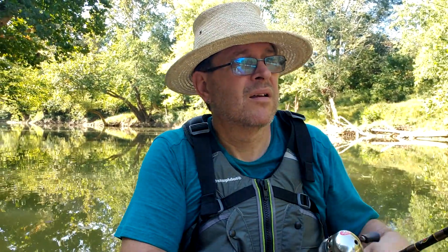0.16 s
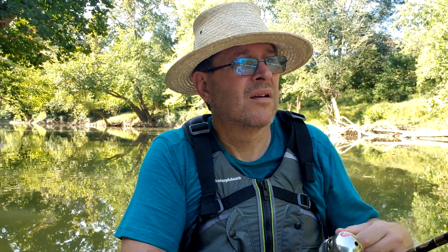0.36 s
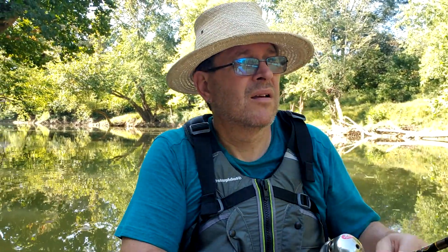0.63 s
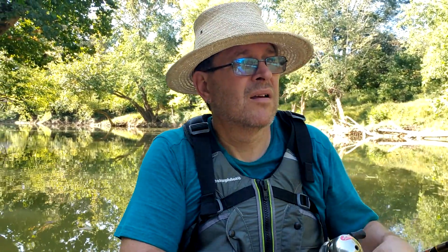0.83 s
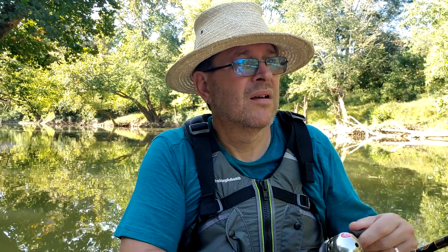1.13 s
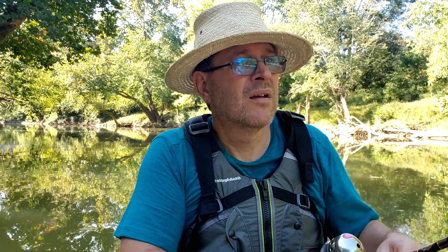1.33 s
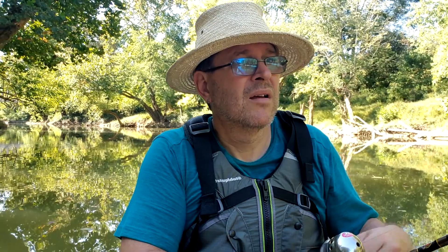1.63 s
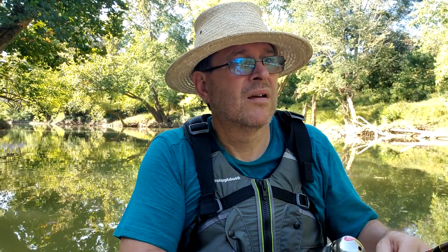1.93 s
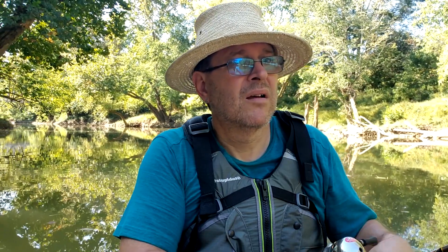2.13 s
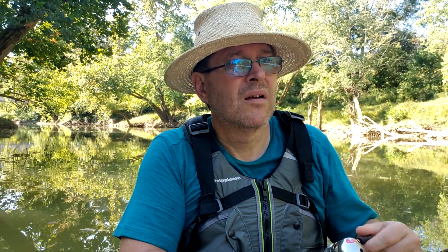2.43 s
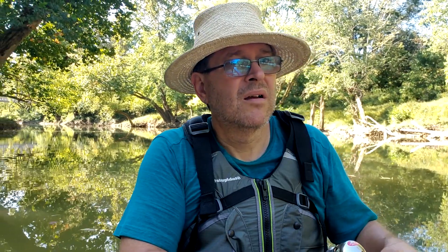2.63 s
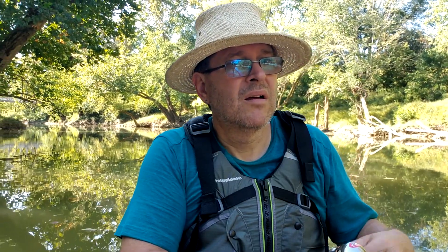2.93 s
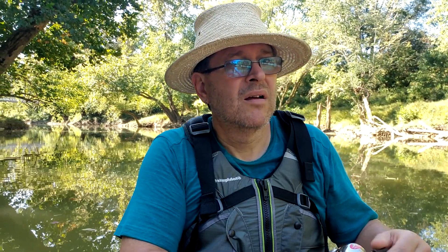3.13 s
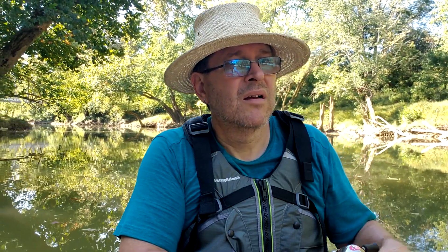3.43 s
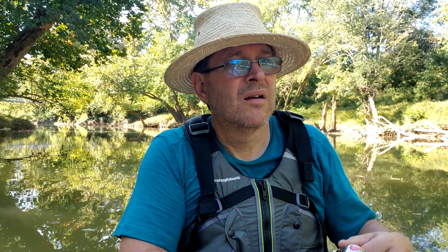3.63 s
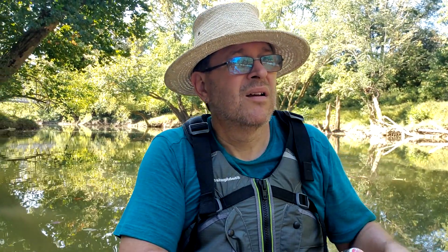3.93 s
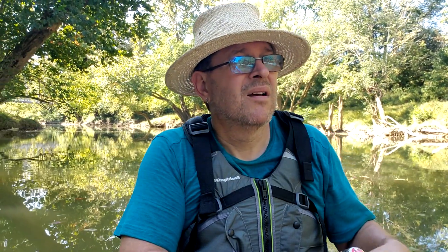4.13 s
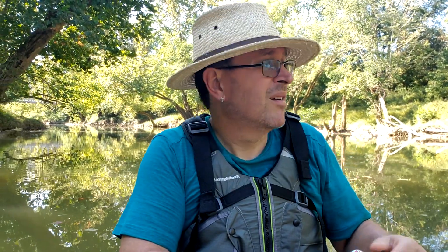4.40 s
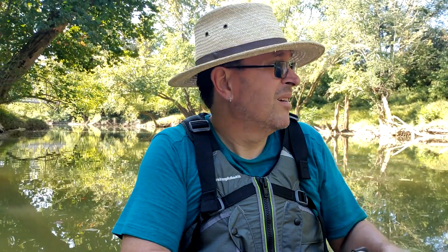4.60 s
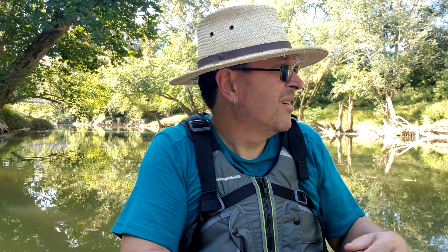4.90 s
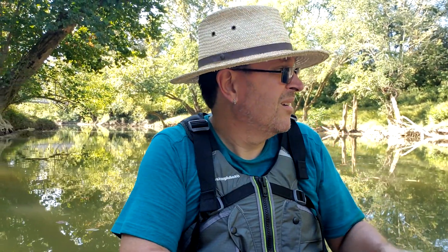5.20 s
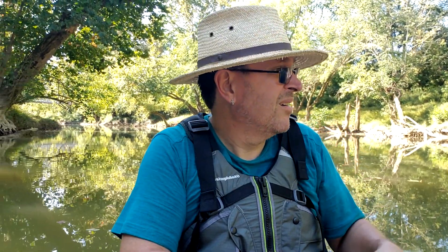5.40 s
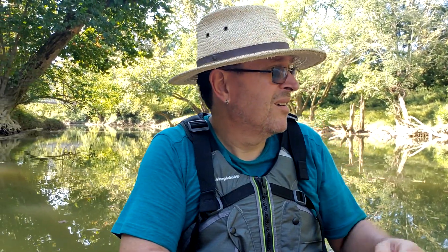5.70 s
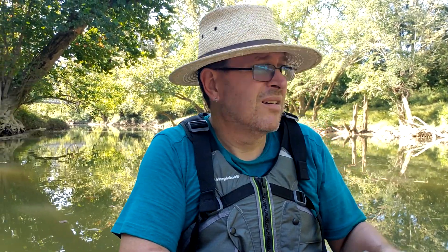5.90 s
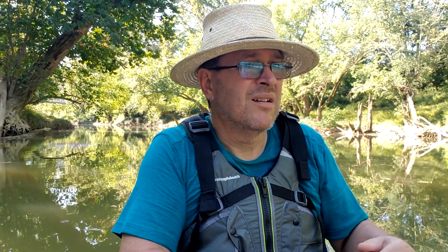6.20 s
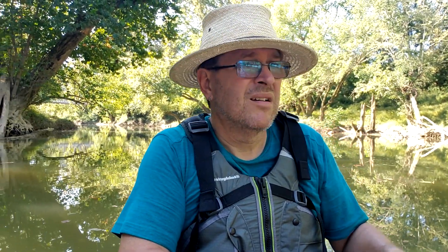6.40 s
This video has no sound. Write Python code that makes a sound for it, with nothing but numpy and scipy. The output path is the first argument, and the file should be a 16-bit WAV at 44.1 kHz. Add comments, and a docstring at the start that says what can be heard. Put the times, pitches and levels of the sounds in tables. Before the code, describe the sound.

Two close katydids, one on the left and one more ahead, scrape out very high buzzes that swell and stop, with runs of dry ticks between them. Behind them a steady insect chorus hisses and crickets trill faintly. A small bird gives short, thin wheezes on the right, and farther birds whistle softly. Late on come two faint bumps on a boat, over a very soft rumble on an open river.

```python
"""Katydids on a late-summer river bank

Two near meadow katydids, one left and one more ahead, scrape their wings in swelling buzzes and runs
of ticks. Behind them sit a shimmer of farther ones, and the steady hiss of an insect chorus and three
crickets across the water. A small bird wheezes on the right, others whistle farther off in the trees,
something knocks faintly on a boat, and the distance rumbles very softly."""
import sys
import numpy as np
from scipy import signal
from scipy.fft import rfft, irfft, next_fast_len
from scipy.io import wavfile
from scipy.ndimage import uniform_filter1d, map_coordinates

SR = 44100
rng = np.random.default_rng(int(sys.argv[2]) if len(sys.argv) > 2 else 0)


def generate_wav(sig):
    """Save sig (samples, or channels by samples) to the path in sys.argv[1] as 16-bit PCM at SR."""
    pcm = np.round(np.clip(np.atleast_2d(sig).T, -1, 1) * 32767).astype(np.int16)
    wavfile.write(sys.argv[1], SR, pcm)


N = 288855

# The near katydids' buzzes. Each row: start and end in seconds, first and last wing cycles per second,
# relative level at the crest in dB.
LEFT_BUZZES = [(-.603, .73, 50.6, 46.2, -32.5), (.773, 2.36, 51.2, 44.4, -31.2),
               (2.378, 3.22, 52, 48.6, -33), (3.559, 4.83, 48.4, 45.7, -31),
               (5.118, 6.55, 48.2, 46.3, -30.2)]
AHEAD_BUZZES = [(-.094, .51, 60.9, 57.8, -32), (1.218, 1.83, 60, 58, -30.5), (2.617, 3.23, 60, 58.4, -32),
                (3.993, 4.63, 59.8, 58.4, -28.5), (5.307, 5.91, 60, 58, -28.5)]
# Single slow wing strokes. Each row: time in seconds, level in dB, left over right in dB.
TICKS = [(.607, -28.5, 10), (.905, -32, 4), (.967, -33, 4), (1.026, -29, 5), (1.075, -29, 6),
         (1.129, -31.5, 5), (2.095, -33, 11), (2.158, -30, 6), (2.264, -35, 16), (2.443, -31, 9),
         (2.492, -34, 14), (2.54, -29, 10), (2.633, -35, 14), (3.093, -32, 18), (3.16, -30.5, 7),
         (3.22, -30, 9), (3.283, -30.5, 8), (3.378, -30.5, 14), (3.438, -28, 9), (3.498, -29.5, 13),
         (3.56, -29.5, 13), (3.74, -28, 5), (3.787, -26, 8), (3.833, -28, 7), (3.888, -27, 7),
         (4.757, -31, 3), (4.82, -34, 10), (4.88, -30, 8), (4.946, -33, 10), (5.005, -28.5, 7),
         (5.03, -32, 1), (5.076, -26.5, 3), (5.122, -29, 5), (5.17, -25, 4), (5.215, -28.5, 5),
         (5.268, -30.5, 5), (6.365, -30, 7), (6.43, -28, 9), (6.472, -33, 5), (6.52, -37, 7)]
# The tone of the katydids' wings; a tick's slow stroke rings them more broadly.
# Each row: frequency in Hz, relative level in dB.
LEFT_WING = [(5800, -76), (6500, -51), (9000, -17), (11000, -7.5), (12200, -4.5), (13500, 1), (14500, 5.5),
             (16000, -0.5)]
AHEAD_WING = [(5800, -76), (6500, -38), (9000, -20), (10600, -19.5), (11700, -3), (12300, -5), (13300, 1.5),
              (14500, -0.5), (16000, -0.5)]
TICK_WING = [(5800, -70), (6500, -30), (9000, -20), (11000, -11), (12200, -4), (13300, 0), (14200, -1.5),
             (15300, 0), (16000, -1), (20000, -8)]
FAR_WING = [(5800, -85), (6500, -36), (9000, -11), (10800, -4), (11900, 0.5), (14000, 2.5), (16000, -2.5)]
# Narrow ringing peaks that nearby reflections add. Each row: centre in Hz, width in Hz, boost in dB.
REFLECTION_PEAKS = [(10880, 140, 3), (11430, 170, 2.5), (11850, 260, 4), (12380, 150, 4), (12660, 190, 10),
                    (13270, 120, 4.5), (13920, 170, 6.5), (14190, 150, 3.5), (14660, 150, 3.5),
                    (14950, 110, 3), (15320, 150, 5.5), (15640, 140, 4.5)]
# Bouts when the far katydids sing together. Each row: start and end in seconds, rise in dB.
FAR_BOUTS = [(-.2, 0.593, 1), (1.134, 1.88, 3), (1.85, 3.23, 1.3), (3.75, 4.663, 3), (5.27, 5.997, 2.7)]
# The tone of the chorus on each side. Each row: frequency in Hz, relative level in dB.
CHORUS_LEFT = [(6050, -81), (6350, -32), (6720, -18), (6880, -9), (7100, -4.5), (7500, -.5), (7950, 1.7),
               (8400, -2), (9000, -16), (11000, -16)]
CHORUS_RIGHT = [(6050, -75), (6350, -35), (6700, -19), (6950, -9), (7150, -6), (7500, 0), (7900, -.3),
                (8400, -9.5), (9000, -19), (11000, -22)]
# The crickets' songs. Each row: pitch in Hz, pulses per second, chirps per second, time offset in
# seconds, depth of the gaps between chirps from 0 to 1, level in dB, left over right in dB.
CRICKETS = [(6380, 29, 4.84, .215, 1, -68, 4), (6580, 29.1, 0, .12, 0, -67, 2), (6260, 31, 0, 0, 0, -77, 0)]
# The small bird's wheezes. Each row: start and length in seconds, first and last top pitch in Hz,
# rough depth of the pitch dips in Hz, relative level in dB, clear note over the rasp in dB.
WHEEZES = [(-.06, 0.11, 4440, 4340, 350, -65.5, -12), (0.527, 0.15, 4365, 4280, 930, -59, -8),
           (1.073, 0.27, 4120, 4060, 654, -63, -9), (1.799, 0.17, 4235, 4250, 753, -59, -6),
           (1.902, 0.12, 3754, 3474, 561, -62.5, -14), (2.944, 0.15, 4277, 4270, 880, -60, -4.5),
           (4.67, 0.15, 4545, 4520, 1150, -57.5, -6), (5.436, 0.096, 4150, 4335, 600, -60, -12),
           (6.211, 0.11, 4096, 4030, 327, -61.5, -6)]
# Far birds' notes. Each row: start and length in seconds, first and last pitch in Hz, level in dB.
FAR_NOTES = [(1.62, .15, 4900, 4890, -73.5), (2.602, 0.26, 5300, 5200, -73), (2.775, 0.45, 5320, 5400, -69),
             (2.885, .15, 5290, 4980, -65), (4.062, 0.041, 3430, 2770, -64)]
# Bumps on the boat. Each row: time in seconds, level in dB.
KNOCKS = [(4.362, -66), (5.017, -56.5)]
# The tone of the hull and of the background air. Each row: frequency in Hz, relative level in dB.
HULL_TONE = [(400, -23), (700, -6), (880, 5), (1000, -11), (1170, 8), (1550, -0.5), (1900, 3), (2300, 0),
             (2800, -7), (4000, -37)]
AIR_TONE = [(20, -9), (40, -7), (60, 0.5), (75, -1), (92, 1), (115, -3.5), (160, -6.5), (300, -10.5),
            (700, -14), (1400, -17), (2500, -20), (4800, -20.5), (6000, -29)]
# How the air leans to the left. Each row: frequency in Hz, left over right in dB.
AIR_PAN = [(100, 1.5), (200, -0.5), (700, 1), (1200, 1), (1800, 9), (2700, 15.5), (5000, 1.5)]
# The reverb of the trees. Each row: frequency in Hz, time to fade by 60 dB in seconds.
GROVE_DECAY = [(1000, 0.25), (4000, 0.69), (10000, 0.5), (16000, 0.39)]


def left_katydid():
    """The nearest singer draws its scraper over its wing file in long buzzes with a slower beat."""
    force = buzzing(LEFT_BUZZES, closing=0.17, opening_db=-5, edge_s=0.012,
                    swell_db=4, crest=0.5, sag_db=4)
    song = radiated(force * teeth(per_s=9000, rough_db=1), LEFT_WING)
    return amp(-1.5) * pan(13) * outdoors(song, scatter_s=0.0043, wet_db=-16)


def ahead_katydid():
    """The second singer answers with short, quick buzzes that build right to the end."""
    force = buzzing(AHEAD_BUZZES, closing=0.097, opening_db=-7, edge_s=0.0075,
                    swell_db=3, crest=0.65, sag_db=-1)
    song = radiated(force * teeth(per_s=10000, rough_db=2), AHEAD_WING)
    return amp(-2) * pan(4.9) * outdoors(song, scatter_s=0.0048, wet_db=-22)


def ticks(half_width_s=0.0059, return_s=0.021, return_db=-10):
    """Each tick is one slow sweep of the scraper along the file, then a weak return stroke."""
    t, force = np.arange(N) / SR, np.zeros((2, N))
    sweep = lambda at: np.exp(-.5 * np.minimum(np.abs(t - at) / half_width_s, 10) ** 2)
    for at, db, left_db in TICKS:
        force += amp(db) * pan(left_db) * (sweep(at) + amp(return_db) * sweep(at + return_s))
    song = radiated(force * teeth(per_s=10000, rough_db=1), TICK_WING)
    return outdoors(song, scatter_s=.004, wet_db=-16)


def buzzing(buzzes, closing, opening_db, edge_s, swell_db, crest, sag_db, uneven_db=1):
    """Force on the file: each wing cycle is a loud closing stroke and a weak opening one."""
    t, force = np.arange(N) / SR, np.zeros(N)
    for start, end, first_rate, last_rate, db in buzzes:
        progress = np.clip((t - start) / (end - start), 0, 1)
        cycles = (t - start) * (first_rate + (last_rate - first_rate) * progress / 2)
        # closing is a half-width in cycles, crest a share of the buzz's length
        off_beat = (cycles + .5) % 1 - .5
        stroke = np.exp(-.5 * (off_beat / closing) ** 2) + amp(opening_db)
        gate = np.clip((t - start) / edge_s + 1, 0, 1) * np.clip((end - t) / edge_s + .5, 0, 1)
        effort_db = db - np.interp(progress, [0, crest, 1], [swell_db, 0, sag_db])
        force = np.maximum(force, amp(effort_db) * unit(stroke) * gate)
    return force * amp(uneven_db * wobble(50))


def teeth(per_s, rough_db):
    """The scraper catches the file's teeth at uneven moments and with uneven force."""
    catches = rng.random(N) < per_s / SR
    return unit(catches * rng.choice([-1, 1], N) * amp(rough_db * rng.standard_normal(N)))


def radiated(scrape, spectrum, early_tuning=.989, crossfade_s=(2.6, 3.8)):
    """A wing radiates a broad band; nearby reflections add narrow peaks that shift slightly up midway."""
    def tuned(tuning):
        def response(hz):
            boost_db = sum(db / (1 + (2 * (hz / tuning - centre) / width) ** 2)
                           for centre, width, db in REFLECTION_PEAKS)
            return unit(amp(along(spectrum, hz) + boost_db))
        return filtered(scrape, response)
    early, late = tuned(early_tuning), tuned(1)
    return early + (late - early) * np.interp(np.arange(N) / SR, crossfade_s, [0, 1])


def far_katydids(join_s=0.05, quit_s=0.07):
    """Many farther singers blur into a fluttering shimmer that rises in bouts, duller on the right."""
    t, level_db = np.arange(N) / SR, np.full(N, -35.0)
    for start, end, rise_db in FAR_BOUTS:
        level_db += rise_db * np.clip(np.minimum((t - start) / join_s, (end - t) / quit_s) + .5, 0, 1)
    flutter_db = 1.22 * wobble(110) + 0.25 * wobble(20.67)
    shimmer = coloured(rng.standard_normal((2, N)), FAR_WING)
    return amp(level_db + flutter_db) * pan_bands(shimmer, [(11000, 1.8), (13500, 1.9), (15200, 3.6)])


def chorus():
    """The insects across the water merge into one even, lower band, stronger and deeper on the right."""
    bed = np.array([coloured(rng.standard_normal(N), side) for side in (CHORUS_LEFT, CHORUS_RIGHT)])
    shimmer_db = 0.66 * wobble(1.84) + 0.39 * np.array([wobble(120), wobble(120)])
    return amp(-43 + shimmer_db) * pan(-4) * bed


def crickets(uneven_db=2, stray_cycles=0.4, sag_hz=110):
    """One cricket chirps and two trill, in pulses of nearly pure tone that sag as the wing slows."""
    t, mix = np.arange(N) / SR, np.zeros((2, N))
    for hz, pulse_rate, chirp_rate, offset, depth, db, left_db in CRICKETS:
        stroke = (pulse_rate * (t - offset) + .5 + stray_cycles * wobble(4)) % 1
        chirps = 1 - depth + depth * np.cos(np.pi * chirp_rate * (t - offset)) ** 14
        tone = sine(hz + sag_hz * (.5 - stroke) + 35 * wobble(40))
        song = np.sin(np.pi * stroke) ** 2 * chirps * tone * amp(uneven_db * wobble(25))
        mix += amp(db) * pan(left_db) * unit(outdoors(song, scatter_s=.02, wet_db=-12))
    return mix


def wheezing_bird(rasp_hz=90, waver_hz=35, fade_share=0.27):
    """A thin wheeze in two voices: one holds a clear top note, the other dips from it in a fast rasp."""
    t, song = np.arange(N) / SR, np.zeros(N)
    dips = np.sin(np.pi * rasp_hz * t + .5 * wobble(60)) ** 2
    dips *= 1 + 0.248 * np.tanh(wobble(110))  # uneven depth
    waver = waver_hz * wobble(70)
    for start, length, first_hz, last_hz, dip_hz, db, clear_db in WHEEZES:
        progress = np.clip((t - start) / length, 0, 1)
        effort = np.clip(np.minimum(progress, 1 - progress) / fade_share, 0, 1) ** 0.5
        top_hz = first_hz + (last_hz - first_hz) * progress + waver
        depth = (1 + np.sin(np.pi * progress ** 1.25)) / 2  # deepest just past the middle
        rasp = sine(top_hz - dip_hz * dips * depth)
        song += amp(db) * effort * (rasp + amp(clear_db) * sine(top_hz))
    grain = unit(amp(1.7 * wobble(180) + 1.4 * wobble(45)))
    return amp(0.9) * pan(-9.5) * outdoors(song * grain, scatter_s=0.05, wet_db=-4.5)


def far_birds(waver_hz=230, broken_db=3):
    """Farther birds add a thin, broken trill that swells and fades, and a few short sliding notes."""
    t, song = np.arange(N) / SR, np.zeros(N)
    waver = waver_hz * wobble(250)
    for start, length, first_hz, last_hz, db in FAR_NOTES:
        progress = np.clip((t - start) / length, 0, 1)
        whistle = sine(first_hz + (last_hz - first_hz) * progress + waver)
        song += amp(db) * np.sin(np.pi * progress) * whistle
    grain = unit(amp(broken_db * wobble(45)))
    return pan(-2.6) * outdoors(song * grain, scatter_s=0.055, wet_db=-13.5)


def boat_knocks(attack_s=0.01, decay_s=0.015):
    """Light, scuffing bumps briefly sound the damped hull."""
    t = np.arange(N) / SR
    contact = sum(amp(db) * np.exp(-np.maximum((at - t) / attack_s, (t - at) / decay_s))
                  for at, db in KNOCKS)
    return pan(1.6) * coloured(contact * rng.standard_normal((2, N)), HULL_TONE)


def air():
    """A soft distant rumble, partly alike in both ears, and a faint, patchy hiss, stronger on the left."""
    left, right = coloured(flicker(rng.standard_normal((2, N))), AIR_TONE)
    shared_bass = filtered(left, lambda hz: along([(100, 0.43), (250, 0.062)], hz))
    bed = np.array([left, unit(right + shared_bass)])
    stir_db = .55 * wobble(7)
    return amp(-66 + stir_db) * pan_bands(bed, AIR_PAN)


def flicker(noise, depth_db=1.5, above_hz=350):
    """Make a noise flicker in small patches of pitch and time; its bass stays even."""
    hz, _, bands = signal.stft(noise, SR, nperseg=1024)
    patches = rng.standard_normal(bands.shape[1:])
    for axis in (0, 1):
        patches = uniform_filter1d(patches, size=4, axis=axis)
    bands *= amp(depth_db * unit(patches) * (hz > above_hz)[:, None])
    return unit(signal.istft(bands, SR, nperseg=1024)[1][:, :N])


def outdoors(x, scatter_s, wet_db):
    """Near stems scatter the sound differently toward each ear, then the trees answer."""
    t = np.arange(SR // 2) / SR
    stems = rng.standard_normal((2, len(t))) * amp(-60 * t / scatter_s)
    hz, age, bands = signal.stft(rng.standard_normal((2, len(t))), SR, nperseg=256)
    bands *= amp(-60 * age / along(GROVE_DECAY, hz)[:, None])
    trees = signal.istft(bands, SR, nperseg=256)[1][:, :len(t)]
    stems, trees = (echo / np.linalg.norm(echo, axis=1, keepdims=True) for echo in (stems, trees))
    paths = rfft(stems + amp(wet_db) * trees)
    # many paths together favour no broad band
    paths /= np.sqrt(uniform_filter1d(np.abs(paths) ** 2, size=250, axis=1))
    return signal.fftconvolve(np.atleast_2d(x), irfft(paths), axes=1)[:, :N]


def amp(db):
    """Decibels to gain."""
    return 10 ** (np.asarray(db) / 20)


def unit(x):
    """Scale to rms 1."""
    return x / np.sqrt(np.mean(x ** 2) + 1e-20)


def sine(hz):
    """A pure tone that follows a pitch curve."""
    return np.sin(2 * np.pi * np.cumsum(hz) / SR)


def wobble(rate):
    """Smooth random modulation through rate points a second."""
    return map_coordinates(rng.standard_normal(int(N * rate / SR) + 4), [np.arange(N) * rate / SR])


def along(points, hz):
    """Read a curve of (Hz, value) points on a log frequency axis."""
    point_hz, values = np.transpose(points)
    return np.interp(np.log(hz + 1), np.log(point_hz + 1), values)


def filtered(x, response):
    """EQ a sound with a gain that depends on frequency."""
    size = next_fast_len(N + SR // 4)
    return irfft(rfft(x, size) * response(np.fft.rfftfreq(size, 1 / SR)), size)[..., :N]


def coloured(x, spectrum):
    """Give a flat sound a spectrum and keep its power."""
    return filtered(x, lambda hz: unit(amp(along(spectrum, hz))))


def pan(left_db):
    """Stereo gains that put the left side left_db above the right."""
    return amp(left_db * np.array([[.5], [-.5]]))


def pan_bands(x, points):
    """Pan each frequency along a curve of (Hz, left over right in dB) points."""
    return filtered(x, lambda hz: pan(along(points, hz)))


def scene():
    """The whole bank, from the katydids up front to the background air."""
    katydids = left_katydid() + ahead_katydid() + ticks() + far_katydids()
    return katydids + chorus() + crickets() + wheezing_bird() + far_birds() + boat_knocks() + air()


def record(dry, top_hz=15750):
    """A brick-wall low-pass takes off the very top."""
    return filtered(dry, lambda hz: hz < top_hz)


dry = scene()
out = record(dry)
generate_wav(out)
```